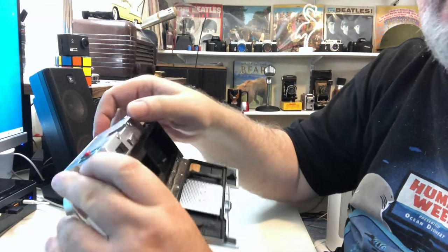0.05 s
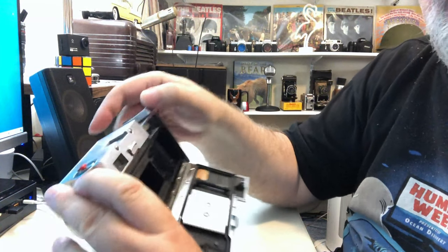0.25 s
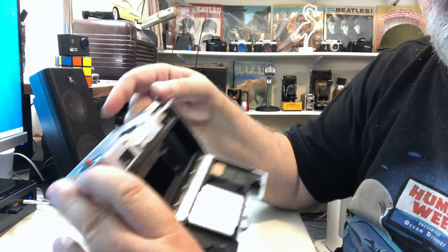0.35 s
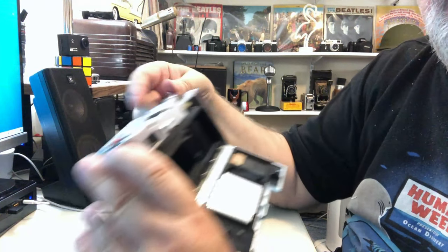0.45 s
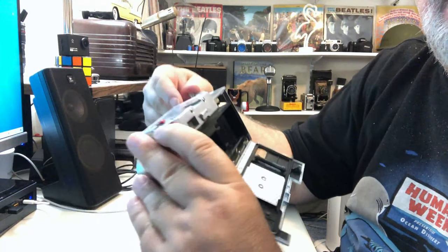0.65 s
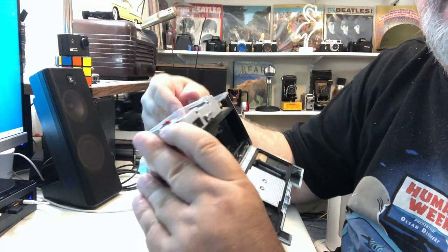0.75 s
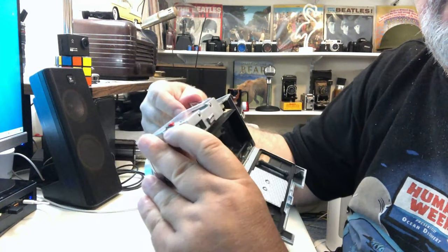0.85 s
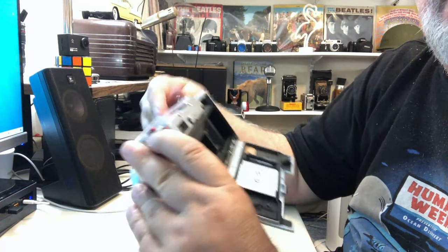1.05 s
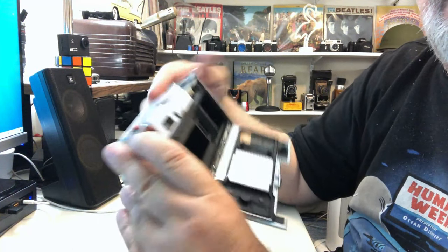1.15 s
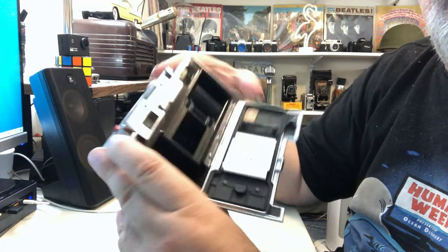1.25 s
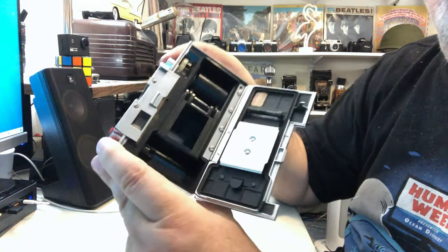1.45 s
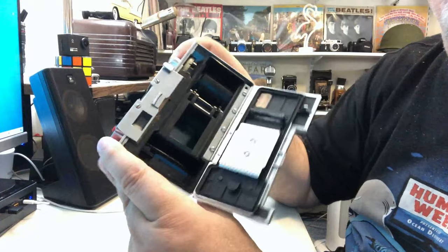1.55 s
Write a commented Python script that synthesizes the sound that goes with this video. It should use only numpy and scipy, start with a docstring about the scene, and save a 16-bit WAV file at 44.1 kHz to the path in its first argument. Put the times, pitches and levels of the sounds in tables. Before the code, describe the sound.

A film camera is wound with a ratcheting whirr, ending in two sharp clicks.

```python
"""Winding a film camera

Close up in a small quiet room, fingers shift their grip on the camera and wind it on.
A pawl whirrs over the ratchet teeth, slows to single clicks, and the mechanism hits its stop.
After a few soft knocks and ticks, a lever lets go with a sharp snap. Only the left channel is live."""
import sys
import numpy as np
from scipy import signal
from scipy.fft import rfft, irfft, next_fast_len
from scipy.io import wavfile
from scipy.ndimage import map_coordinates

SR = 44100
rng = np.random.default_rng(int(sys.argv[2]) if len(sys.argv) > 2 else 0)


def wrap_up_sound(samples):
    """Save the sound to the file named by the first command line argument, as 16-bit audio."""
    columns = np.atleast_2d(samples).T
    # keep every value between -1 and 1, then stretch to whole-number steps
    tamed = np.clip(columns, -1, 1)
    steps = np.round(tamed * 32767).astype(np.int16)
    wavfile.write(sys.argv[1], SR, steps)


N = 70560

# tone of skin rubbing, of knocks, of ticks and of the noise floor (frequency [Hz], level [dB])
RUB_COLOUR = [(200, 3), (550, -9.5), (790, 7), (1000, -0.5), (1400, 2.5), (1900, -7.5), (4800, -8),
              (7500, -10), (10000, -16), (15000, -22)]
KNOCK_COLOUR = [(200, -26.5), (700, -17.5), (1100, -7.5), (1500, 1.5), (1750, -2.5), (2300, -11.5),
                (3500, -16.5), (6000, -25.5), (15000, -39)]
TICK_COLOUR = [(300, -22), (1500, -6), (3000, 3), (5000, 9), (8000, 0), (15000, -12)]
FLOOR_COLOUR = [(25, -46), (42, -33), (58, -1), (80, -4), (135, -5), (270, -3.5), (400, -12.5),
                (900, -13.5), (1300, -16.5), (2800, -21.5), (8000, -30.5), (15800, -38.5)]
# ticks and soft knocks of the mechanism, including the end stop's dull rebound
# (time [s], level [dB], hold [s])
TICKS = [(.011, -43.5, .005), (.172, -48, 0.0029), (.1778, -44, 0.00093), (.839, -31, .003),
         (1.128, -49, .015), (1.2285, -28, .009), (1.373, -56, 0.0044), (1.5742, -49.5, 0.0036)]
KNOCKS = [(.178, -40.5, .002), (0.1867, -31.5, 0.0014), (.8392, -36.5, 0.0038), (1.2164, -31.5, 0.0008),
          (1.2218, -32.5, 0.0011), (1.227, -35, 0.0049), (1.2326, -28, 0.0039)]
# hard hits of the end stop and the lever's snap (time [s], level [dB], hold [s])
STOP_HITS = [(.8119, -11, 0.00081), (.815, -14.5, 0.002)]
SNAP_HITS = [(1.2387, -14.5, 0.0095)]
# turn of the winding wheel (time [s], teeth passed [count])
WHEEL_TURN = [(.2225, 0), (.2362, 2), (.2452, 3), (.2675, 7), (.2765, 9), (.3124, 17), (.3359, 22),
              (.3764, 29), (.399, 32), (.407, 33), (.4397, 37), (.458, 39), (.475, 41), (.4978, 44),
              (.546, 50), (.558, 51)]
# level rides for the pawl and the gear rattle along the turn (time [s], level [dB])
PAWL_LEVELS = [(.22, -19), (.255, -19.5), (.28, -18.5), (.31, -19), (.335, -20.5), (.39, -19.5),
               (.485, -18.5), (.499, -17), (.512, -19), (.56, -18)]
GEAR_LEVELS = [(.22, -32), (.31, -34.5), (.365, -28), (.402, -32.5), (.48, -32.5), (.502, -27.5),
               (.53, -32), (.62, -32.5), (.79, -33.5)]
# last single clicks of the pawl (time [s], level [dB])
LAST_TEETH = [(0.5755, -19), (.612, -16.5), (0.6529, -18.5), (0.714, -19), (0.759, -19), (0.7855, -25.5),
              (0.7932, -18)]
# resonances of the pawl in its three stages, the gears, stop and lever (frequency [Hz], level [dB])
FAST_PEAKS = [(2950, -13.5), (3560, -8.5), (4350, -7), (5370, -4.5), (6000, -13), (6550, -8.5),
              (7650, -2.5), (8250, 0.5), (8880, -0.5), (10250, -2), (11200, -8.5), (12000, -12.5)]
EASING_PEAKS = [(3350, -8.5), (3900, -8.5), (4750, -9), (5580, -1.5), (6050, -11), (7600, -0.5), (8850, -2),
                (9350, -1.5), (10220, -3), (11200, -15)]
SLOW_PEAKS = [(3480, -2), (3930, -9.5), (4760, -1.5), (5550, -1.5), (7530, 0), (7950, 0), (9100, -3),
              (9900, -1), (10900, -13)]
GEAR_PEAKS = [(1170, -1), (1730, 2.5), (1950, -3.5), (2250, -7.5)]
STOP_PEAKS = [(370, -18), (1370, -8.5), (1840, -3.5), (2150, -11.5), (3620, 0), (4470, -3.5), (4850, -1.5),
              (6300, -4), (7100, -2), (7780, -1), (9450, -2.5), (10420, -5.5)]
SNAP_PEAKS = [(620, -15), (1230, -3), (1690, 3.5), (2200, -5.5), (3350, 1), (4450, -2), (4850, 0.5),
              (5680, 1), (6950, 2.5), (8000, 1.5), (8800, 2.5), (11800, -0.5)]
# metallic ring of the camera's shell and of the ratchet (frequency [Hz], level [dB], t60 [s])
SHELL_MODES = [(1350, -35, .05), (1690, -21, .12), (2850, -31, .06), (4550, -26, .07), (7830, -26, .08),
               (8790, -27, .06)]
RATCHET_MODES = [(1690, -39, .12), (3480, -29, .056), (4780, -27, .03), (8186, -33, .1), (9346, -34, .06)]
# decay of the room's tail (frequency [Hz], t60 [s])
ROOM_T60 = [(300, 0.23), (2000, 0.25), (8000, 0.22), (15000, 0.16)]

ATTACK_S, SAG_DB_PER_S = 0.00033, 892  # envelope of every contact's rattle
TICK_T60_S, SNAP_T60_S = 0.053, 0.028
TOOTH_SCATTER_DB, TOOTH_JITTER_S = .5, .0001  # uneven teeth
EASING_S, SLOW_FROM_S = (0.39, 0.47), 0.555  # the pawl's tone crossfades to easing, then cuts to slow
THUD_HZ, THUD_T60_S, THUD_DB = 191, 0.069, -33.5  # body thump, level relative to its tooth


def amp(db):
    """Decibels to gain."""
    return 10 ** (np.asarray(db) / 20)


def unit(x):
    """Scale to rms 1."""
    return x / np.sqrt(np.mean(x ** 2) + 1e-20)


def along(points, hz):
    """Read a (frequency [Hz], value) curve on a log frequency axis."""
    freqs, values = np.transpose(points)
    return np.interp(np.log(hz + 1), np.log(freqs + 1), values)


def coloured(x, colour):
    """Minimum-phase EQ, so nothing rings ahead of a hit; white noise keeps its power."""
    size = 2 * next_fast_len(N)
    gain = unit(amp(along(colour, np.fft.rfftfreq(size, 1 / SR))))
    cepstrum = irfft(np.log(gain + 1e-6))
    cepstrum[1:size // 2] *= 2
    cepstrum[size // 2 + 1:] = 0
    return irfft(rfft(x, size) * np.exp(rfft(cepstrum)))[:N]


def resonant(peaks, spread, bed_db, low_cut_hz):
    """EQ curve of a small part: peaks, widened by spread, over a flat bed, with the bass rolled off."""
    hz = np.geomspace(20, SR / 2, 900)
    power = amp(bed_db) ** 2
    for centre, db in peaks:
        width_hz = spread * (140 + .017 * centre)
        power += amp(db) ** 2 / (1 + (2 * (hz - centre) / width_hz) ** 2)
    return np.column_stack([hz, 10 * np.log10(power / (1 + (low_cut_hz / hz) ** 4))])


def add(track, s, sound):
    """Mix a sound in at s seconds."""
    part = track[max(0, round(s * SR)):][:len(sound)]
    part += sound[:len(part)]


def rattle(hold, t60):
    """Envelope of one contact: a sharp attack, a short sagging hold, a fast fall."""
    t = np.arange(SR // 20) / SR
    return np.minimum(t / ATTACK_S, 1) * amp(-SAG_DB_PER_S * t - 60 * np.maximum(t - hold, 0) / t60)


def ring(modes, scatter_db=2):
    """Metal modes, struck a little differently each time."""
    t = np.arange(SR // 5) / SR
    return sum(amp(db + scatter_db * rng.normal() - 60 * t / t60)
               * np.sin(2 * np.pi * (hz * t + rng.random())) for hz, db, t60 in modes)


def contacts(hits, colour, t60, ring_db, impact_db):
    """Parts strike inside the camera: a transient, a noisy rattle and the ring of the shell."""
    cracks, shell = np.zeros((2, N))
    for s, db, hold in hits:
        envelope = rattle(hold, t60)
        add(cracks, s + ATTACK_S, [amp(db + impact_db)])
        add(cracks, s, amp(db) * envelope * rng.standard_normal(len(envelope)))
        add(shell, s, amp(db + ring_db) * ring(SHELL_MODES))
    return coloured(cracks, colour) + shell


def fingers(hold_s=0.071, fade_db_per_s=295, grain_db=1.0, slips_per_s=180):
    """Skin slips unevenly over the body: a brief, grainy rub at the start."""
    t = np.arange(N) / SR
    level_db = -45.5 - fade_db_per_s * np.maximum(t - hold_s, 0)
    slips = map_coordinates(rng.standard_normal(N), [t * slips_per_s])
    friction = rng.standard_normal(N) * amp(grain_db * slips)
    return amp(level_db) * unit(coloured(friction, RUB_COLOUR))


def knocks_and_snap(spread):
    """Soft knocks and ticks of the mechanism, including the stop's dull rebound; a lever snaps free."""
    snap_colour = resonant(SNAP_PEAKS, spread, bed_db=-12.5, low_cut_hz=610)
    snap = contacts(SNAP_HITS, snap_colour, SNAP_T60_S, ring_db=-4, impact_db=17)
    knocks = contacts(KNOCKS, KNOCK_COLOUR, TICK_T60_S, ring_db=1, impact_db=19.5)
    ticks = contacts(TICKS, TICK_COLOUR, TICK_T60_S, ring_db=-11, impact_db=-8)
    return snap + knocks + ticks


def pawl_drops():
    """Cue list for the pawl (time [s], level [dB]): a slightly uneven run, then the last single teeth."""
    turn_s, teeth = np.transpose(WHEEL_TURN)
    times = np.interp(np.arange(round(teeth[-1]) + 1), teeth, turn_s)
    late, harder = rng.standard_normal((len(times), 2)).T
    levels = np.interp(times, *np.transpose(PAWL_LEVELS)) + TOOTH_SCATTER_DB * harder
    return list(zip(times + TOOTH_JITTER_S * late, levels)) + list(LAST_TEETH)


def ratchet(spread):
    """The pawl drops off each tooth and shakes the gears; its tone shifts as the wheel slows."""
    drops = pawl_drops()
    envelope = rattle(hold=0.0039, t60=.015)
    t = np.arange(len(envelope)) / SR
    common = rng.standard_normal(len(t))
    thud = amp(THUD_DB - 60 * t / THUD_T60_S) * np.sin(2 * np.pi * THUD_HZ * t)
    fast, easing, slow, gears, body = np.zeros((5, N))
    for s, db in drops:
        is_slow = s > SLOW_FROM_S
        alike = .3 if is_slow else .2  # share of the rattle that the teeth have in common
        noise = np.sqrt(alike) * common + np.sqrt(1 - alike) * rng.standard_normal(len(t))
        click = amp(db) * envelope * noise
        if is_slow:
            add(slow, s, click)
        else:
            eased = np.interp(s, EASING_S, (0, 1))
            add(fast, s, (1 - eased) * click)
            add(easing, s, eased * click)
            add(body, s, amp(db) * thud)  # each quick tooth nudges the whole body
        gear_db = np.interp(s, *np.transpose(GEAR_LEVELS))
        add(gears, s, amp(gear_db) * envelope * rng.standard_normal(len(t)))
        add(body, s, amp(db) * ring(RATCHET_MODES))
    pawl = (coloured(fast, resonant(FAST_PEAKS, spread, bed_db=-20.5, low_cut_hz=2320))
            + coloured(easing, resonant(EASING_PEAKS, spread, bed_db=-15, low_cut_hz=2270))
            + coloured(slow, resonant(SLOW_PEAKS, spread, bed_db=-24.5, low_cut_hz=2260)))
    gear_colour = resonant(GEAR_PEAKS, spread=0.96, bed_db=-17, low_cut_hz=990)
    return pawl + coloured(gears, gear_colour) + body


def end_stop(spread):
    """The wheel runs into its stop and chatters."""
    colour = resonant(STOP_PEAKS, spread, bed_db=-19, low_cut_hz=443)
    return contacts(STOP_HITS, colour, SNAP_T60_S, ring_db=-9, impact_db=11.5)


def room(x, tail_db=-10, early_db=-15.5, early_t60_s=0.027, predelay_s=.005):
    """Early reflections off the desk and shelves, and a short tail whose treble dies first."""
    hz, t, spectrum = signal.stft(rng.standard_normal(SR // 2), SR, nperseg=256)
    decay = amp(-60 * t / along(ROOM_T60, hz)[:, None])
    tail = signal.istft(spectrum * decay, SR, nperseg=256)[1]
    early = rng.standard_normal(len(tail)) * amp(-60 * np.arange(len(tail)) / SR / early_t60_s)
    response = amp(tail_db) * tail / np.linalg.norm(tail) + amp(early_db) * early / np.linalg.norm(early)
    return signal.fftconvolve(x, np.pad(response, (round(predelay_s * SR), 0)))[:N]


def scene():
    """Mechanism, reverb, fingers and noise floor, mixed hard left."""
    direct = ratchet(spread=1) + end_stop(spread=1) + knocks_and_snap(spread=0.98)
    blur = 4  # the room gathers sound from every side of the camera, so its resonances widen
    reverb = room(ratchet(blur)) + room(end_stop(blur)) + amp(-2) * room(knocks_and_snap(blur))
    floor = amp(-50.5) * unit(coloured(rng.standard_normal(N), FLOOR_COLOUR))
    left = 2 * (direct + reverb + fingers() + floor)
    return np.array([left, np.zeros(N)])


def record(dry):
    """Clip at full scale, then cut the very top with a brick-wall low-pass."""
    size = next_fast_len(N + SR // 2)
    passband = np.fft.rfftfreq(size, 1 / SR) < 15850
    return irfft(rfft(np.clip(dry, -1, 1), size) * passband, size)[:, :N]


dry = scene()
out = record(dry)
wrap_up_sound(out)
```